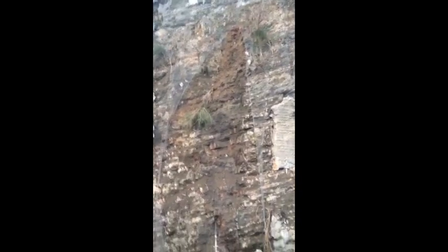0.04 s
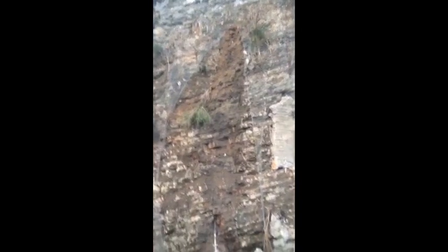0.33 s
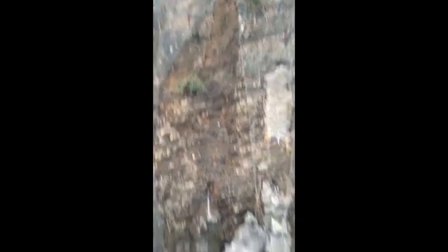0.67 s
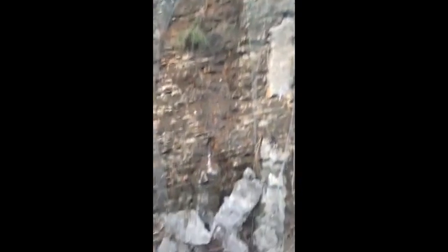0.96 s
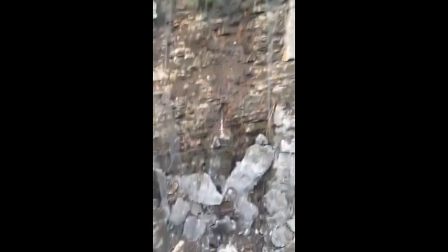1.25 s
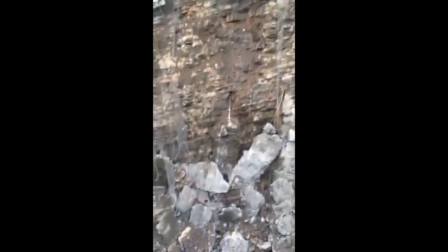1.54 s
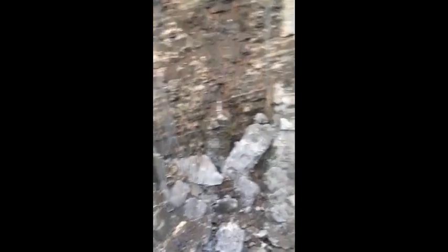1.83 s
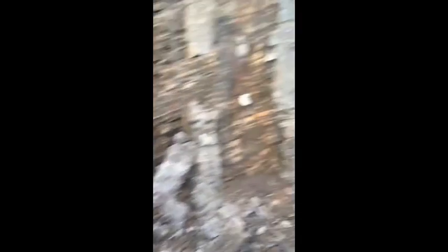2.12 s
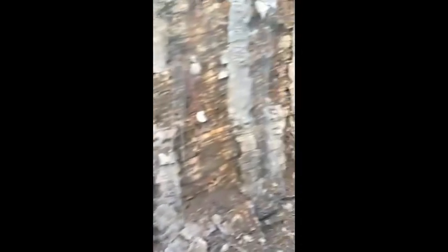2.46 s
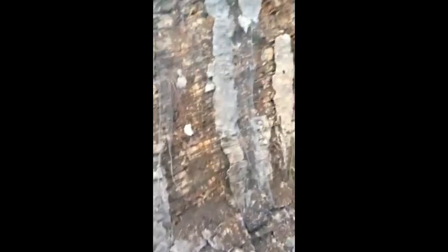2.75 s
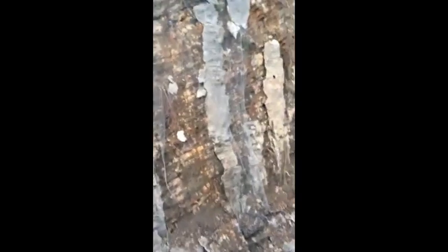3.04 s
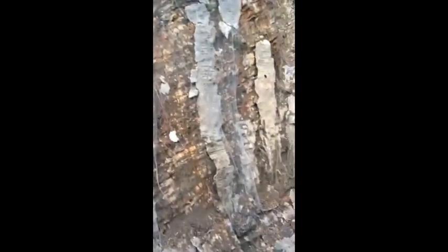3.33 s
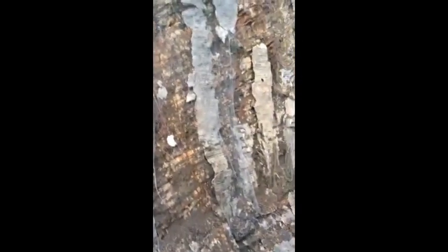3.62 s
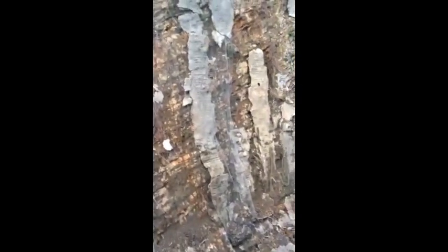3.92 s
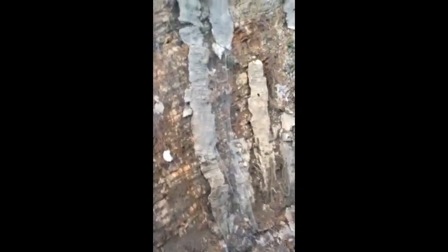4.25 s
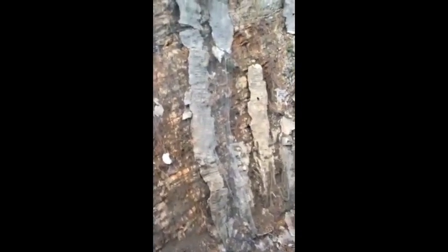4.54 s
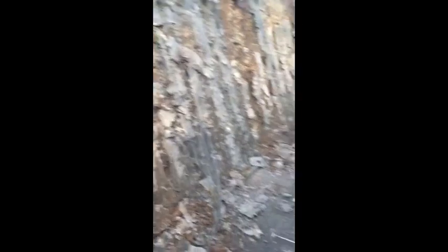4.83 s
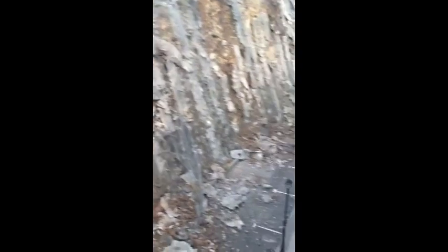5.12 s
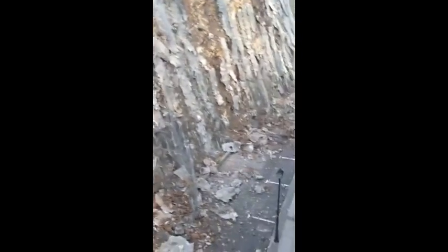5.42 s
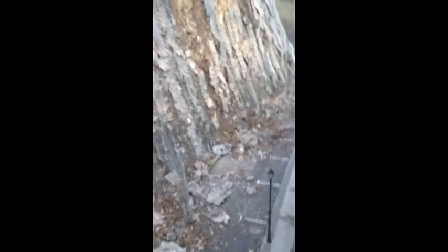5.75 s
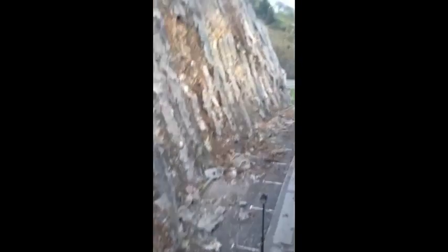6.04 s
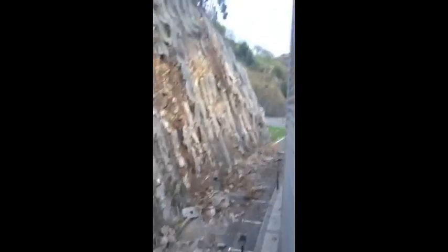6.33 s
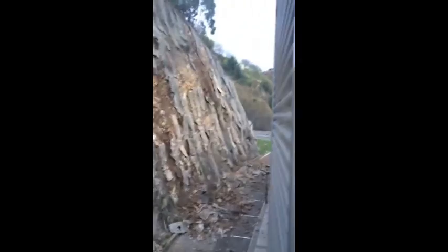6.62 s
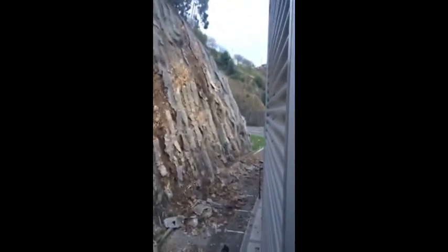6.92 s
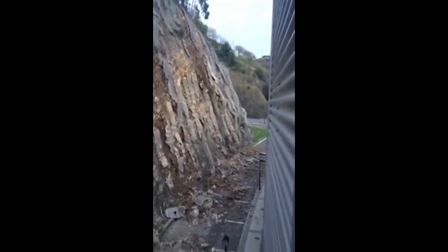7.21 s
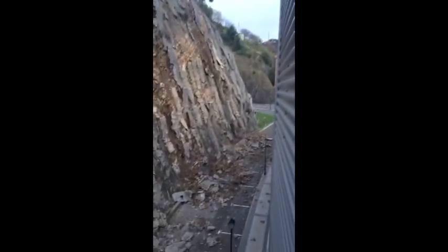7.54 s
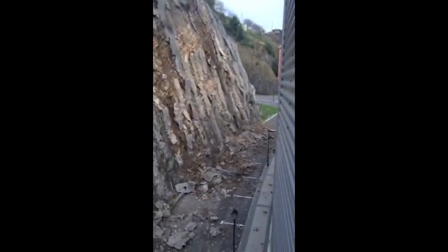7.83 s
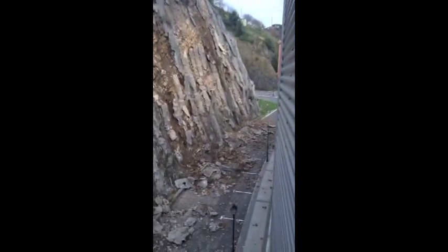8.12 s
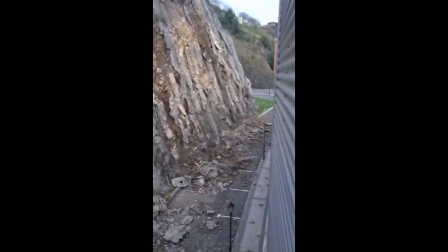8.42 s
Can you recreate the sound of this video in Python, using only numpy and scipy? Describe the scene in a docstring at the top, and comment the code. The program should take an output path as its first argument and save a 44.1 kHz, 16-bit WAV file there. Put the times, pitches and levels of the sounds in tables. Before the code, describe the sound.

Single stones clack down a cliff, then heavy blocks thud into rubble and burst, followed by sliding gravel.

```python
"""Rock falls from a layered cliff onto the road, heard from a small microphone below the face.
For six seconds single stones clack down the ledges, each cracking, crumbling and ringing, while
grit trickles close by. Then heavy blocks thud into the rubble and burst, and a sheet of gravel
slides after them in countless small collisions. The rock face and the building opposite
scatter a short echo; light wind and a faint hum lie underneath."""
import sys
import numpy as np
from scipy import signal
from scipy.fft import rfft, irfft, next_fast_len
from scipy.io import wavfile

SR = 44100
rng = np.random.default_rng(int(sys.argv[2]) if len(sys.argv) > 2 else 0)


def file_out(sig):
    """Save sig as 16-bit WAV at sys.argv[1]."""
    # one column per channel
    cols = np.atleast_2d(sig).T
    # limit, then scale
    lim = np.clip(cols, -1, 1)
    pcm = np.round(lim * 32767).astype(np.int16)
    wavfile.write(sys.argv[1], SR, pcm)


N = 377937


def from_db(db):
    """Decibels to gain."""
    return 10 ** (np.asarray(db) / 20)


def unit_rms(x):
    """Scale to rms 1."""
    return x / np.sqrt(np.mean(x ** 2) + 1e-20)


def unit_blow(x):
    """Scale a blow to the energy of 10 ms at rms 1."""
    return x / np.sqrt(np.sum(x ** 2) / (SR / 100) + 1e-20)


def curves(rows):
    """Each column of a timed table at every sample."""
    times, *columns = np.transpose(rows)
    return [np.interp(np.arange(N) / SR, times, column) for column in columns]


def band(x, low_hz, high_hz, order=2):
    """Causal band-pass."""
    low = np.clip(low_hz, 15, .3 * SR)
    high = np.clip(high_hz, 1.1 * low, .45 * SR)
    return signal.lfilter(*signal.butter(order, [low, high], "band", fs=SR), x + 1e-18)


def ring(x, hz, t60):
    """One mode: a unit click sets a sine of height 1 ringing."""
    decay = from_db(-60 / (t60 * SR))
    angle = 2 * np.pi * min(hz, .45 * SR) / SR
    return signal.lfilter([0, np.sin(angle)], [1, -2 * decay * np.cos(angle), decay ** 2], x + 1e-18)


def colour_gain(colour, hz):
    """Gain of a spectrum, read on a log-frequency axis."""
    knots_hz, db = np.transpose(colour)
    return from_db(np.interp(np.log(np.maximum(hz, 1)), np.log(knots_hz), db))


def noise(colour):
    """Smooth noise of a given colour, rms 1."""
    size = next_fast_len(N)
    gain = colour_gain(colour, np.fft.rfftfreq(size, 1 / SR))
    return unit_rms(irfft(rfft(rng.standard_normal(size)) * gain, size)[:N])


def drift(per_s):
    """A random wander, rms 1."""
    knots = rng.standard_normal(2000)
    return unit_rms(np.interp(np.arange(N) / SR * per_s, np.arange(len(knots)), knots))


def add(out, start, sound):
    """Mix a sound in at a start time in seconds."""
    i = max(round(start * SR), 0)
    out[i:i + len(sound)] += sound[:N - i]


def crumble(t60, per_s, first, size=6000):
    """Force of a landing: a sharp contact of height `first`, then a dying run of tiny fractures."""
    t = np.arange(size) / SR
    fractures = rng.standard_normal(size) * (rng.random(size) < per_s / SR) * from_db(-60 * t / t60)
    force = fractures / np.sqrt(np.sum(fractures ** 2) + 1e-12)
    force[0] += first
    return force


def grains(colour, per_s, size_db, cycles, low_hz, high_hz, pitches):
    """Countless small collisions of uneven size, each ringing briefly in up to three modes; rms 1."""
    hits = np.flatnonzero(rng.random(N) < per_s * from_db(3.5 * drift(25)) / SR)
    sizes = from_db(size_db * np.minimum(rng.exponential(1, N), 4))
    kicks = sizes * rng.choice([-1, 1], N) / np.sqrt(per_s)
    modes = rng.integers(0, pitches, (3, N))
    out = np.zeros(N)
    for k, hz in enumerate(np.geomspace(low_hz, high_hz, pitches)):
        struck = hits[(modes[:, hits] == k).any(axis=0)]
        clicks = np.zeros(N)
        clicks[struck] = kicks[struck]
        ringing = unit_rms(np.diff(ring(clicks, hz, cycles / hz), prepend=0))
        out += colour_gain(colour, hz) * np.sqrt(hz) * ringing * (-1) ** k
    return unit_rms(out)


# The steady slide down the face. Each row: time in seconds, gravel and sand levels in relative dB.
SLIDE_LEVELS = [(0, -59.5, -60), (1.7, -59, -56.5), (2.0, -54, -52.5), (2.6, -60, -52.5),
                (2.85, -57, -55.5), (3.7, -52.5, -58.5), (4.4, -60, -59), (5.1, -58, -67),
                (5.48, -56.5, -56.5), (5.62, -50.5, -54), (6.03, -53.5, -51), (6.5, -47.5, -47),
                (7.2, -40, -40), (7.7, -40.5, -41.5), (8.26, -42.5, -39), (8.57, -43, -46.5)]
# Spectra of the sliding debris. Each row: frequency in Hz, relative level in dB.
GRAVEL_SPECTRUM = [(200, -4), (400, 8.5), (560, 6.5), (850, 3), (1300, 4.5), (2300, 0.5), (3500, -5),
                   (6000, -9.5), (11000, -40)]
SAND_SPECTRUM = [(1500, -0.5), (2800, -1), (4300, -3.5), (6200, -11), (7800, -9), (11000, -31)]
RUBBLE_SPECTRUM = [(40, -25), (80, -2.5), (160, 5.5), (300, -0.5), (500, -28), (1000, -58)]


def slide():
    """Gravel and sand collide faster as the slide grows; far grains blur into hiss, rubble rumbles."""
    gravel_db, sand_db = slide_levels()
    per_s = 400 * from_db(.7 * (gravel_db - gravel_db.min()))
    gravel = grains(GRAVEL_SPECTRUM, per_s, size_db=1, cycles=22.5, low_hz=340.6, high_hz=6100,
                    pitches=20)
    sand = grains(SAND_SPECTRUM, per_s, size_db=2.5, cycles=26, low_hz=2337, high_hz=10380, pitches=10)
    gravel = unit_rms(gravel + .5 * noise(GRAVEL_SPECTRUM))
    sand = unit_rms(sand + .81 * noise(SAND_SPECTRUM))
    rubble = from_db(.95 * gravel_db - 9.5) * noise(RUBBLE_SPECTRUM)
    return from_db(gravel_db - 2.5) * gravel + from_db(sand_db - 4.5) * sand + rubble


def slide_levels():
    """Gravel and sand in dB: the steady slide, with the rushes added to its gravel."""
    gravel_db, sand_db = curves(SLIDE_LEVELS)
    rush_power = sum((from_db(db) * rush(start, hold)) ** 2 for start, db, _, hold in GRAVEL_RUSHES)
    return 10 * np.log10(from_db(gravel_db) ** 2 + rush_power), sand_db


# Fine grit close to the microphone. Each row: time in seconds, level in relative dB.
GRIT_LEVELS = [(0, -63), (1.2, -67.5), (2.1, -62.5), (3.0, -65.5), (4.4, -66.5), (4.8, -71), (5.8, -71),
               (6.9, -64), (8.57, -59.5)]
# Its spectrum. Each row: frequency in Hz, relative level in dB.
GRIT_SPECTRUM = [(2000, -14), (4000, 7), (7500, 2.5), (10000, 2), (13000, -52)]


def trickle():
    """Fine grit patters and hisses down the nearest ledges."""
    grit_db, = curves(GRIT_LEVELS)
    patter = grains(GRIT_SPECTRUM, 900, size_db=2.5, cycles=55, low_hz=3030, high_hz=11300, pitches=9)
    return from_db(grit_db + 2.5) * unit_rms(patter + noise(GRIT_SPECTRUM))


# A faint hum in the background. Each row: time in seconds, pitch in Hz, level in dB.
LOW_HUM = [(0, 66.7, -71), (.6, 64.5, -57.5), (.95, 63.4, -60), (1.2, 62, -73), (2.5, 59, -67),
           (2.9, 58.7, -61), (3.3, 58, -80.5)]
# Wind over the road. Each row: frequency in Hz, relative level in dB.
WIND_SPECTRUM = [(25, -19), (45, 2.5), (70, 0.5), (110, 0), (180, -3), (300, -5), (600, -18.5), (2000, -24),
                 (10000, -42)]


def wind_and_hum(wind_db=-60, gust_db=3):
    """Light wind with a faint hiss, and a low hum that comes and goes, wavers and slowly sinks."""
    hum_hz, hum_db = curves(LOW_HUM)
    hum_gain = from_db(hum_db + 2 * drift(7.3))
    phase = 2 * np.pi * np.cumsum(hum_hz + 2 * drift(10)) / SR
    wind = from_db(wind_db + gust_db * drift(18)) * noise(WIND_SPECTRUM)
    return wind + hum_gain * unit_rms(np.sin(phase))


# Flakes on the nearest ledge, too light to clack.
# Each row: start in seconds, level in dB, pitch in Hz, share of ring against tick from 0 to 1.
FLAKE_TICKS = [(1.457, -51, 3240, .4), (1.618, -50.5, 7800, 0.1), (1.694, -48.5, 4040, 0.4),
               (1.851, -50, 4800, 0.2), (1.892, -53, 2880, .5), (2.147, -48, 3900, .3),
               (2.282, -46, 7250, 0.06), (2.395, -47.5, 7000, .2), (2.461, -54, 7600, 0.2),
               (2.477, -48.5, 4920, .8), (2.647, -50, 7640, 0.4), (3.102, -47.5, 4800, 0.3),
               (3.252, -45.5, 8600, .2), (3.565, -50.5, 7040, 0.17), (3.809, -48, 7030, 0.6),
               (4.026, -48.5, 4950, .2), (4.297, -52, 4400, .3), (5.816, -49, 2720, .3),
               (7.214, -43, 6040, 0.76)]


def flakes(faint_per_s=14, faint_hz=4800, spread=1.74):
    """A flake gives one dry tick and may ring briefly; the grit carries more, faint and at random."""
    out = np.zeros(N)
    grit_db, = curves(GRIT_LEVELS)
    faint = []
    for i in np.flatnonzero(rng.random(N) < faint_per_s / SR):
        level_db = grit_db[i] + rng.uniform(-1.5, 10.6)
        hz = faint_hz * 2 ** (.7 * rng.uniform(-.97, 1))
        faint.append((i / SR, level_db, hz, rng.random()))
    for start, level_db, hz, share in list(FLAKE_TICKS) + faint:
        force = crumble(.027, per_s=1600, first=.61)
        tick = unit_blow(band(force, hz / spread, hz * spread))
        ringing = unit_blow(ring(force, hz, t60=.022))
        add(out, start, from_db(level_db) * unit_blow((1 - share) * tick + share * ringing))
    return out


def stone_modes(force, main_hz, second_hz, cycles):
    """An irregular lump rings with two strong damped modes and a weak, unrelated higher one."""
    third_hz = max(main_hz, second_hz) * rng.uniform(1.2, 1.8)
    modes = ((1, main_hz), (-.74, second_hz), (.21, third_hz))
    return unit_blow(sum(share * unit_blow(ring(force, hz, cycles / hz)) for share, hz in modes))


SECOND_MODE_RATIO = 1.378   # to the main mode, in pebbles and skipping stones


def pebbles(typical_hz=1250, octaves=.699, uneven_db=3, tries=800):
    """Pebbles clink in the moving gravel, more often and, up to a point, louder as the slide grows."""
    out = np.zeros(N)
    gravel_db, _ = slide_levels()
    activity = np.clip(from_db(.55 * (gravel_db + 41)), 0, 1)
    moments, chances = rng.integers(0, N, tries), rng.random(tries)
    for i, chance, size, pitch in zip(moments, chances, *rng.normal(0, 1, (2, tries))):
        if chance < activity[i]:
            hz = typical_hz * 2 ** (octaves * min(pitch, 1))
            force = crumble(.043, per_s=1100, first=.6, size=2000)
            clink = stone_modes(force, hz, hz * SECOND_MODE_RATIO, cycles=52)
            level_db = min(gravel_db[i], -40) - 3.5 + uneven_db * min(size, 1.6)
            add(out, i / SR, from_db(level_db) * clink)
    return out


def skipping_stones(peak_per_s=8, typical_hz=2300, octaves=.6, uneven_db=4):
    """Small stones skip down near ledges, more and louder with the grit; rows as in STONE_HITS."""
    grit_db, = curves(GRIT_LEVELS)
    per_s = peak_per_s * from_db(.92 * (grit_db - grit_db.max()))
    moments = np.flatnonzero(rng.random(N) < per_s / SR)
    draws = np.clip(rng.normal(0, 1, (300, 4)), -2, 2)
    rows = []
    for i, (size, pitch, chipping, softness) in zip(moments, draws):
        hz = typical_hz * 2 ** (octaves * pitch)
        level_db = grit_db[i] + 9 + uneven_db * size
        chips_db = grit_db[i] + 6 + uneven_db * chipping
        rows.append((i / SR, level_db, hz, hz * SECOND_MODE_RATIO, chips_db, .13 * 2 ** softness))
    return rows


# Single stones striking the ledges above the road. Each row: start in seconds, level in dB,
# main and second mode in Hz, level of the chips in relative dB, crumbling t60 in seconds.
STONE_HITS = [(0.4508, -53, 2040, 2900, -71, 0.018), (0.4755, -53, 1510, 2100, -58, 0.016),
              (0.7077, -46, 1450, 1970, -67, 0.055), (.741, -48, 1400, 2200, -59, 0.033),
              (.907, -47, 2300, 1940, -61, 0.013), (1.0027, -52, 800, 2300, -58, 0.022),
              (1.0451, -46, 590, 1980, -50.5, 0.011), (1.314, -36.5, 1670, 2350, -66.5, 0.052),
              (1.4437, -47.5, 2340, 1640, -55, 0.065), (1.978, -44.5, 1800, 2500, -63, 0.088),
              (2.084, -44.5, 1520, 1980, -56, 0.087), (2.32, -51, 1380, 2000, -68, 0.024),
              (2.3521, -43.5, 790, 1370, -55, 0.045), (2.429, -41, 2220, 3000, -61, 0.028),
              (2.617, -49, 2130, 2900, -60, 0.017), (2.698, -57, 2380, 3350, -53, .04),
              (3.083, -48.5, 2400, 3200, -55, 0.064), (3.447, -49, 2100, 3100, -64, 0.026),
              (3.833, -50, 2300, 1600, -66, .025), (3.856, -44.5, 3800, 4640, -57, .023),
              (3.913, -56, 2700, 3100, -71, 0.026), (4.09, -47.5, 2650, 1480, -55, 0.15),
              (4.418, -49, 3900, 2650, -55, 0.008), (4.425, -49.5, 3350, 2090, -69, .02),
              (4.4639, -47, 2800, 1980, -43.5, 0.021), (4.524, -49, 970, 636, -65, 0.15),
              (4.548, -54, 1470, 2000, -54.5, 0.13), (5.348, -46.5, 4040, 3400, -49.5, 0.13),
              (5.559, -44, 4400, 2200, -68, 0.0088), (5.6457, -42, 1420, 905, -47, 0.0074),
              (5.6685, -41.5, 1060, 1500, -57.5, 0.11), (5.832, -46, 2050, 2900, -66, .015),
              (6.096, -40, 1190, 2440, -59.5, 0.017), (6.1594, -32, 705, 1410, -55.5, 0.037),
              (6.4133, -37, 1430, 2000, -63, 0.011), (6.4881, -41, 1950, 2890, -52, 0.0029),
              (6.56, -29, 1260, 1880, -56, 0.023), (6.57, -31, 1910, 1290, -50.5, 0.015),
              (6.639, -36, 496, 1110, -43, 0.031), (6.729, -28, 593, 1290, -46, 0.018),
              (6.763, -27, 1300, 650, -53, .012), (6.7794, -26, 1230, 884, -55, 0.049),
              (6.842, -30.5, 1300, 3060, -61, 0.013), (6.852, -38, 4400, 3200, -58, .008),
              (6.864, -29.5, 1480, 1960, -50, 0.016), (6.902, -30.5, 895, 1800, -43, .025),
              (6.923, -30, 484, 1500, -37, 0.024), (6.9953, -28.5, 2640, 3440, -53, 0.031),
              (7.07, -30.5, 2830, 1500, -60.5, 0.022), (7.1277, -28.5, 1100, 840, -49, 0.032),
              (7.151, -37, 2250, 3780, -61, 0.019), (7.2108, -33.5, 600, 1180, -46, 0.042),
              (7.2691, -28, 2000, 2800, -48, 0.057), (7.367, -38.5, 2390, 3130, -51.5, .04),
              (7.4167, -35, 535, 1750, -43, 0.015), (7.4388, -38.5, 645, 980, -67, .013),
              (7.507, -34, 1300, 720, -58, 0.027), (7.567, -28.5, 1740, 2100, -52, 0.054),
              (7.627, -35.5, 2750, 3170, -60, 0.066), (7.7628, -35.5, 1210, 2840, -60, 0.05),
              (7.843, -32.5, 1050, 1700, -59, 0.046), (7.955, -38.5, 1320, 2200, -55, 0.013),
              (8.0468, -24, 1900, 857, -60.5, 0.057), (8.0795, -31, 2280, 1390, -54, 0.066),
              (8.238, -43, 3400, 4870, -63, 0.033), (8.323, -37.5, 2070, 2980, -59, 0.03),
              (8.3848, -35, 1300, 2300, -47, 0.077), (8.409, -31, 1290, 2090, -61, 0.055),
              (8.5242, -40, 2870, 1710, -53, 0.074)]


def clacks(spread=1.71):
    """Rock on rock cracks, crumbles and rings hollow; chips fly off, finer from the smaller stones."""
    out = np.zeros(N)
    contacts = list(STONE_HITS) + block_contacts() + skipping_stones()
    for start, level_db, main_hz, second_hz, chips_db, t60 in contacts:
        hz = np.sqrt(main_hz * second_hz)
        force = crumble(t60, per_s=5000, first=.027)
        tap = signal.unit_impulse(len(force))
        hardness = min(.013 / t60, 1)   # a hard, clean hit puts more into its first crack
        crack = unit_blow(band(tap, hz / spread, hz * spread, order=3))
        crunch = unit_blow(band(force, hz / spread, hz * spread))
        ledge = unit_blow(band(force, hz / 4, hz / spread))   # the duller note of the rock beneath
        ringing = stone_modes(force + 1.54 * hardness * tap, main_hz, second_hz, cycles=14)
        clack = unit_blow(.35 * hardness * crack + crunch + .81 * ledge + 2.46 * ringing)
        top_hz = 2.3 * max(main_hz, second_hz)   # rough faces cannot make a sharp edge
        clack = unit_blow(band(clack, 90, top_hz, order=3))
        chip_hz = np.clip(3.56 * hz, 3200, 7200)
        chipping = crumble(t60 * 1.74, per_s=1500, first=.29)
        chips = band(chipping, chip_hz / 3.2, chip_hz * .93, order=1)
        chips = unit_blow(band(chips, 900, chip_hz * 1.64))   # grit cushions the sharpest edges
        add(out, start, from_db(level_db) * clack + from_db(chips_db + 5) * chips)
    return out


def cliff_echo(x, near_db=-12, near_t60=.21, far_db=-16, far_rise_s=.095, far_t60=.43):
    """Ledges scatter the sound at once; the building opposite sends back a later, duller wash."""
    t = np.arange(SR) / SR
    reflections = rng.standard_normal(SR) * (rng.random(SR) < .03) * (t > .004)
    near = unit_rms(reflections * from_db(-60 * t / near_t60))
    wash = rng.standard_normal(SR) * np.minimum(t / far_rise_s, 1) ** 3
    far = band(unit_rms(wash * from_db(-60 * t / far_t60)), 56, 2000, order=1)
    response = from_db(near_db) * near + from_db(far_db) * far
    return signal.fftconvolve(x, response / np.sqrt(SR))[:N]


# Modes of thin rock plates struck on the ledges.
# Each row: start in seconds, level in dB, pitch in Hz, t60 in seconds.
PLATE_MODES = [(1.317, -48, 1740, 0.13), (1.851, -54, 4780, .25), (1.913, -43, 2620, 0.18),
               (1.912, -58, 4700, 0.36), (2.822, -45.5, 1150, 0.082), (2.825, -35, 1633, 0.062),
               (2.823, -35, 4020, 0.024), (4.4642, -36.5, 2610, 0.049), (4.4635, -41, 4730, 0.033),
               (4.515, -48, 1780, .1), (4.575, -46, 1735, 0.15), (5.348, -45, 3330, 0.16),
               (5.358, -50.5, 4150, 0.086), (5.362, -55, 6901, .13), (5.362, -50, 7770, 0.13),
               (8.439, -30.5, 1840, 0.055), (8.525, -38, 2850, 0.12)]


def plates(rattle=.43):
    """A thin plate clinks and rings on; it rattles on the ledge, which roughens the ring."""
    out = np.zeros(N)
    for start, level_db, hz, t60 in PLATE_MODES:
        rattling = rattle * crumble(.06, per_s=900, first=0, size=SR // 2)
        force = (signal.unit_impulse(len(rattling)) + rattling) / np.sqrt(1 + rattle ** 2)
        add(out, start, from_db(level_db) * ring(force, hz, t60))
    return out


# Blocks dragging over grit. Each row: start and length in seconds, level in dB, rasp pitch in Hz.
BLOCK_DRAGS = [(1.795, 0.33, -67, 4650), (5.52, 0.29, -59.5, 4930), (6.11, 0.084, -53, 2940),
               (8.2, .07, -47.5, 3460)]


def scrapes(slips_per_s=300, uneven_db=1, spread=1.104):
    """A dragged block sticks and slips unevenly; the rasp swells and fades."""
    out = np.zeros(N)
    for start, length, level_db, hz in BLOCK_DRAGS:
        size = int(length * SR)
        slips = (rng.random(SR) < slips_per_s / SR) * from_db(uneven_db * rng.standard_normal(SR))
        rasp = band(slips[:size], hz / spread, hz * spread)
        add(out, start, from_db(level_db) * unit_rms(rasp * np.sqrt(np.hanning(size))))
    return out


# Heavy blocks landing in the rubble below the face. Each row: the six columns of STONE_HITS for
# the clack, then the thud's level in dB, pitch in Hz and t60 in seconds.
BLOCK_LANDINGS = [(1.9117, -35, 770, 2190, -41, 0.054, -35, 153, 0.21),
                  (2.371, -42.5, 1497, 696, -48.5, 0.024, -41.5, 275, 0.12),
                  (2.913, -40, 2410, 3320, -55, 0.038, -44.5, 284, 0.091),
                  (3.012, -37.5, 1880, 2380, -51.5, 0.066, -45, 225, .15),
                  (3.1787, -39.5, 760, 3000, -55.5, 0.015, -30, 183, .13),
                  (3.23, -38, 1090, 690, -52, 0.029, -40.5, 300, 0.13),
                  (3.6292, -29, 1030, 1550, -51.5, 0.042, -35.5, 370, 0.18),
                  (3.6964, -26, 950, 1340, -42, 0.011, -38.5, 326, 0.098),
                  (4.1933, -42.5, 1260, 790, -52, 0.011, -38, 250, 0.11),
                  (5.015, -53, 420, 594, -72, 0.11, -51, 382, 0.24),
                  (5.7311, -47, 533, 1110, -68, 0.008, -42, 400, .03),
                  (5.8354, -46, 400, 840, -60, 0.02, -30, 308, 0.069),
                  (6.078, -29, 615, 1240, -42.5, 0.035, -26.5, 115, 0.33),
                  (6.177, -29.5, 496, 1470, -42, 0.055, -21.5, 104, 0.38),
                  (6.243, -44, 605, 1300, -64, .05, -26.5, 83.4, 0.28),
                  (6.2846, -36, 710, 1020, -52, 0.16, -31.5, 100, 0.13),
                  (6.6, -25, 510, 890, -43, 0.082, -24, 265, .18),
                  (6.7167, -21.5, 586, 1110, -30.5, 0.082, -25.5, 166, .18),
                  (6.7485, -20.5, 1270, 1970, -53, .02, -27, 342, 0.15),
                  (6.857, -23.5, 730, 1950, -33, 0.028, -32.5, 284, 0.16),
                  (6.8907, -24, 1110, 1700, -39.5, 0.057, -26, 350, 0.24),
                  (7.018, -20, 555, 1480, -34, 0.0055, -23.5, 470, .08),
                  (7.4897, -32, 550, 1110, -46, 0.17, -29, 284, .025),
                  (7.5394, -21.5, 1340, 586, -40, 0.041, -20, 186, 0.11),
                  (7.6509, -31.5, 1410, 2420, -49, 0.072, -33.5, 316, .06),
                  (7.6751, -39, 1480, 2100, -51, 0.035, -32, 214, 0.36),
                  (8.283, -31.5, 1504, 1270, -42, 0.029, -36, 204, 0.15)]


def thuds(spread=1.38):
    """A block pushes the rubble, which sinks in pitch as it settles; the ground answers an octave down."""
    out = np.zeros(N)
    for start, *_, level_db, hz, t60 in BLOCK_LANDINGS:
        force = crumble(t60, per_s=1700, first=0, size=16000)
        tap = signal.unit_impulse(len(force))
        push = unit_blow(band(tap, 1.1 * hz / spread, 1.1 * hz * spread))
        settling = unit_blow(band(force, hz / spread, hz * spread))
        ground = unit_blow(band(force, hz / 2 / spread, hz / 2 * spread))
        add(out, start, from_db(level_db) * unit_blow(push + 1.75 * settling + .25 * ground))
    return out


def block_contacts(tip_ratio=.8):
    """Blocks clack; one that lands hard and crumbles tips onto a second face, weaker and lower."""
    landings = [block[:6] for block in BLOCK_LANDINGS]
    tips = []
    for start, level_db, main_hz, second_hz, chips_db, t60 in landings:
        if level_db > -34.5 and t60 > .021:
            tip_s = start + .009 * rng.uniform(.74, 1.4)
            modes_hz = main_hz * tip_ratio, second_hz * tip_ratio
            tips.append((tip_s, level_db - 10, *modes_hz, chips_db - 20, t60))
    return landings + tips


# Gravel let loose when a block bursts. Each row: start in seconds, gravel level in relative dB,
# spray level in dB, hold in seconds.
GRAVEL_RUSHES = [(6.07, -45.5, -50.5, 0.14), (6.703, -36.5, -47, 0.03), (6.843, -31, -35.5, 0.09)]
# Spectrum of the spray. Each row: frequency in Hz, relative level in dB.
SPRAY_SPECTRUM = [(1000, -9), (2200, 2.5), (3300, 3), (5000, -4), (6800, -10.5), (10000, -39)]


def spray():
    """A bursting block throws out a dense, bright crunch of crushed chips."""
    chips = grains(SPRAY_SPECTRUM, 5000, size_db=3, cycles=37, low_hz=2000, high_hz=7360, pitches=10)
    gain = sum(from_db(db) * rush(start, hold) for start, _, db, hold in GRAVEL_RUSHES)
    return gain * unit_rms(chips + .66 * noise(SPRAY_SPECTRUM))


def rush(start, hold, attack_s=.014, fall_db_per_s=64):
    """Gain of a rush of gravel: it swells, holds and runs out."""
    t = np.arange(N) / SR - start
    return np.clip(t / attack_s, 0, 1) * from_db(-fall_db_per_s * np.maximum(t - attack_s - hold, 0))


# Air right on the microphone. Each row: time in seconds, level in dB.
BUFFET_LEVELS = [(6.07, -78), (6.09, -40), (6.19, -34), (6.32, -50), (6.38, -78)]
# Its spectrum. Each row: frequency in Hz, relative level in dB.
BUFFET_SPECTRUM = [(25, -13), (60, 8), (100, -3), (170, -29), (400, -70)]


def buffet():
    """A short, deep flutter of air hits the microphone as the biggest blocks land."""
    level_db, = curves(BUFFET_LEVELS)
    return from_db(level_db) * noise(BUFFET_SPECTRUM)


def rolls(above_db=-26, loss_db=7, delay_s=.02, pitch_ratio=.87, spread=2.1):
    """The heaviest blocks roll on over the rubble after their thud, with a rumble that dies away."""
    out = np.zeros(N)
    for start, *_, thud_db, thud_hz, _ in BLOCK_LANDINGS:
        force = crumble(.53, per_s=1600, first=0, size=24000)
        if thud_db > above_db:
            hz = pitch_ratio * thud_hz
            rumble = unit_blow(band(force, hz / spread, hz * spread))
            add(out, start + delay_s, from_db(thud_db - loss_db) * rumble)
    return out


def scene():
    """Blows with their echo over the sliding debris and the open air, in mono."""
    blows = clacks() + flakes() + thuds() + rolls() + plates() + pebbles() + scrapes()
    return (blows + cliff_echo(blows) + slide() + spray() + trickle() + wind_and_hum() + buffet())[None]


def record(dry, bass_cut_hz=42, top_cut_hz=10600):
    """A small microphone loses the deepest bass; the top is cut steeply."""
    thin = signal.sosfilt(signal.butter(3, bass_cut_hz, "high", fs=SR, output="sos"), dry)
    return signal.sosfilt(signal.ellip(10, .3, 70, top_cut_hz, fs=SR, output="sos"), thin)


dry = scene()
out = record(dry)
file_out(out)
```